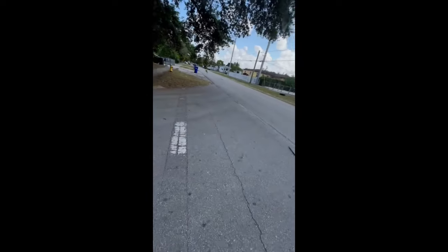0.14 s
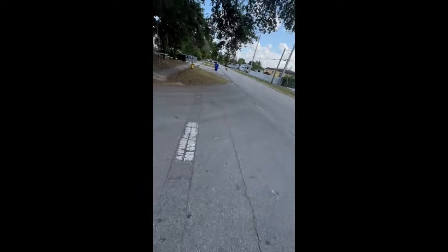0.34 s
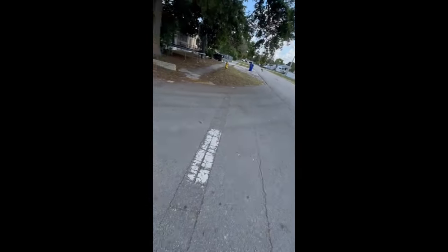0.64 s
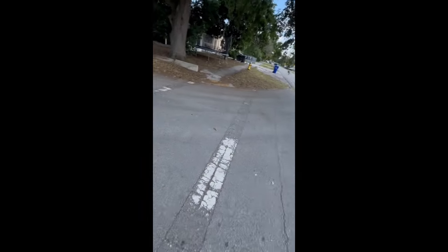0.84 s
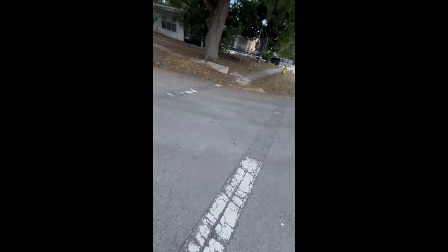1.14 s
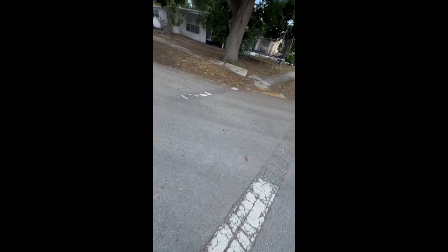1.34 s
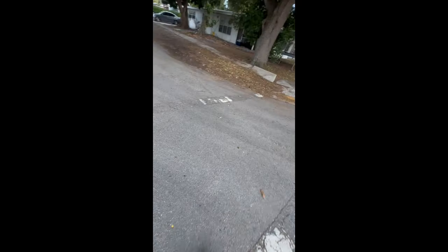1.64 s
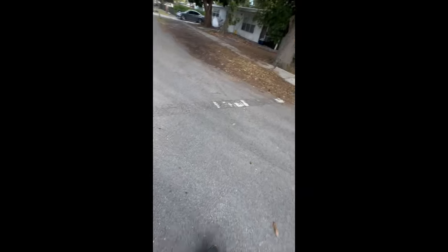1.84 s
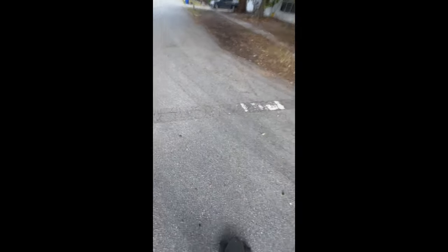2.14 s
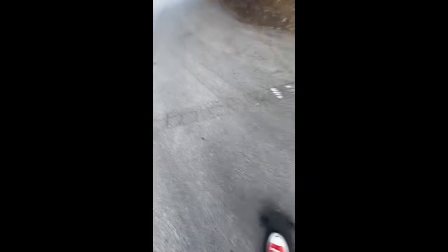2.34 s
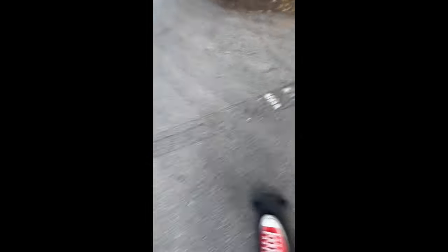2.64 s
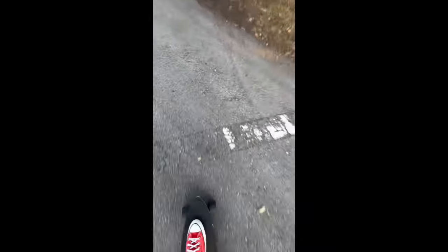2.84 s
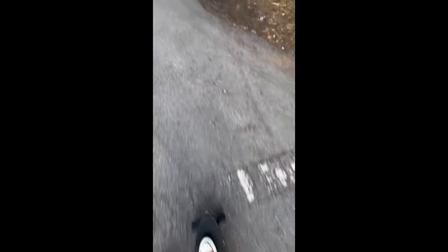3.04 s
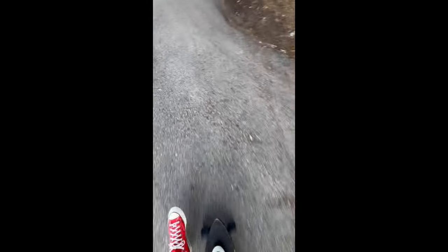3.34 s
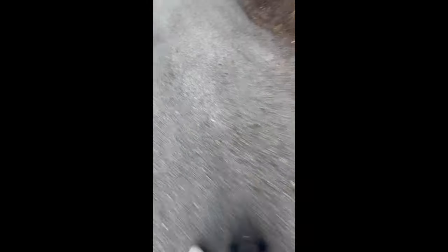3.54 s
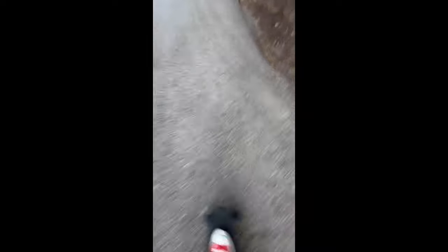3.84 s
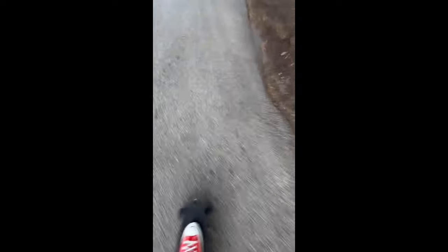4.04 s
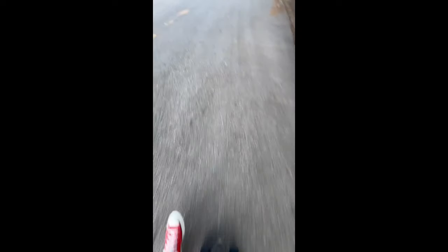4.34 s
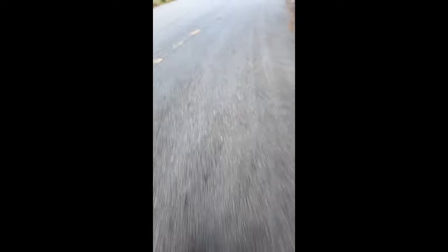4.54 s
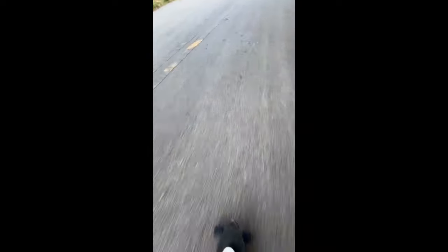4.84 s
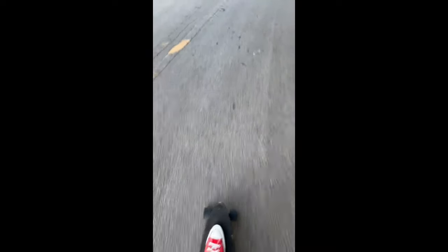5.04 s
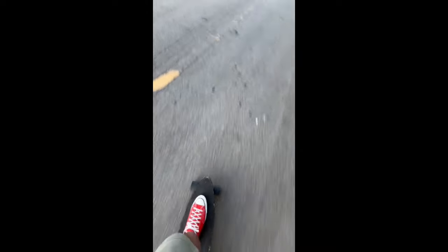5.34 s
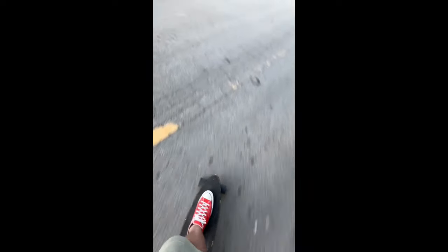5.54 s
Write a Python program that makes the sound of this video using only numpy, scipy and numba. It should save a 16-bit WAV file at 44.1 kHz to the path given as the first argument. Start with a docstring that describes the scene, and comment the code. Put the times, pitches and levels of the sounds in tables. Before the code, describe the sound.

On an open street, a passing car's smooth tyre roar pulls ahead and fades over the first few seconds. Grit ticks and wind puffs hit the handheld phone. Then a longboard deck rumbles over rough asphalt, wheels hissing, while a shoe scrapes and crunches in bursts, strongest near the end, with low wind buffeting in close stereo.

```python
"""A longboard is pushed over rough asphalt by a rider with a phone in hand: road grain shakes the deck into
its bending modes, the wheels hiss, and the shoe sole crunches grit in sticking, slipping bursts.
A car rolls away as coloured noise that changes its timing between the two microphone ports, then fades.
Loose stones tick and crack as short rings, wind and puffs press on the ports as slow noise,
and a cricket, a narrow band of noise, sings faintly over the smooth wash of the street."""
import sys
import numpy as np
from scipy import signal
from scipy.fft import rfft, irfft, next_fast_len
from scipy.io import wavfile
from scipy.ndimage import uniform_filter1d
from numba import njit

SR = 44100
rng = np.random.default_rng(int(sys.argv[2]) if len(sys.argv) > 2 else 0)


def dump_mix(stems):
    """Bounce the given channels to the path in sys.argv[1] as a 16-bit WAV at rate SR."""
    frames = np.atleast_2d(stems).T  # one column per channel
    limited = np.clip(frames, -1, 1)  # hard clip at full scale
    pcm = np.round(limited * 32767).astype(np.int16)
    wavfile.write(sys.argv[1], SR, pcm)


def invert_db(x):
    """Field ratio 10**(x/20) for x, a level in decibels (scalar or array-like)."""
    u = np.asarray(x, float) / 20
    return 10 ** u


N = 251414
SIZE = next_fast_len(N, real=True)
FREQS, TIMES = np.fft.rfftfreq(SIZE, 1 / SR), np.arange(N) / SR

# Tyre roar of the departing car. Each row: time in seconds, level in dB.
CAR_LEVEL = [(0.0, -29), (0.12, -27.5), (0.3, -26), (0.55, -26.5), (0.72, -25.5), (0.92, -27), (1.58, -33),
             (2.0, -35.5), (2.3, -41.5)]
# Tone of the tyre roar. Each row: frequency in Hz, relative gain in dB.
CAR_COLOUR = [(120, -17), (300, 1), (600, -7.5), (900, -0.5), (1300, -3), (1900, -13), (2500, -32),
              (5000, -34.5), (9000, -51)]
# Fuller tone while the car is close. Each row: frequency in Hz, gain in dB.
ALONGSIDE_BODY = [(150, 1.5), (350, 1), (600, 9.5), (900, 2.5), (1800, -2.5), (2700, 2), (4500, 3.5)]
# Lead of the left port over the right, car alongside. Each row: frequency in Hz, phase in radians.
ALONGSIDE_PHASE = [(0, -1), (350, -1.4), (850, -1.6), (1400, -1), (1700, -.2), (2070, 1), (2400, 3),
                   (2750, 3.6), (3300, 3.1), (4000, 2.5), (5550, 4), (8200, 8.5)]
# The same lead once the car has pulled ahead. Each row: frequency in Hz, phase in radians.
AHEAD_PHASE = [(0, 0), (350, -.3), (700, -.7), (1050, -1.1), (1400, .1), (2070, .1), (2400, 1.4),
               (2750, -.2), (4000, 1.5), (8200, 8.5)]

# Wheel hiss. Each row: time in seconds, level in dB.
HISS_LEVEL = [(0.0, -42), (0.5, -38.5), (1.0, -39.5), (1.5, -60), (2.2, -54.5), (3.0, -41), (3.55, -40.5),
              (4.0, -35.5), (4.6, -33), (5.3, -31.5), (5.5, -38.5), (5.7, -43)]
# Tone of the wheel hiss. Each row: frequency in Hz, relative gain in dB.
HISS_COLOUR = [(300, 13.5), (800, 21), (1500, -2.5), (2500, -6.5), (5000, -3), (8500, -5.5), (13000, -6),
               (16000, -22)]
# Tone of leaves and far traffic. Each row: frequency in Hz, relative gain in dB.
STREET_COLOUR = [(1200, 6), (2000, -3.5), (4000, -6), (7500, -6), (10000, -6), (15000, -13)]

# Puffs across the phone. Each row: start in seconds, hold in seconds, level in dB.
CROSS_PUFFS = [(0.03, 0.06, -29.5), (0.406, 0.026, -28), (0.466, 0.053, -28), (0.666, 0.051, -17.5),
               (0.728, 0.052, -25.5), (1.258, 0.092, -37), (2.29, 0.05, -36)]
# Tone of the puffs. Each row: frequency in Hz, relative gain in dB.
PUFF_COLOUR = [(40, -8), (100, 0), (220, 0), (400, -13), (800, -9), (1500, -28), (3000, -63)]
# Grit ticking off the wheels. Each row: time in seconds, drive of the bright crack in dB,
# drive of the duller body over the crack in dB.
TICKS = [(0.0466, -27, -8.5), (0.092, -22, -13), (0.138, -24, -24), (0.192, -27.5, -18),
         (0.3568, -22.5, -14), (0.364, -34, -10), (0.399, -29.5, -4), (0.541, -32, -3), (0.615, -25, -11),
         (0.6698, -29, -24), (1.0135, -32.5, 8.5), (1.837, -40, -2), (1.889, -40, -19), (2.69, -30.5, -8),
         (5.1068, -25.5, -23)]

# Deck shake. Each row: time in seconds, shake level in dB, extra gain of the upper modes in dB.
ROLL = [(0.0, -66, -12), (0.16, -35.5, -4), (0.58, -29.5, 3), (0.68, -30, -13), (0.78, -29, -8.5),
        (1.45, -34, -2), (2.2, -39, 1), (2.44, -31, -3), (2.55, -39.5, -1.5), (2.79, -29, -5),
        (3.05, -38.5, 2.5), (3.3, -32, -3.5), (3.55, -36, -8), (3.72, -26, -7), (3.83, -20.5, -2.5),
        (4.2, -25.5, -1), (4.5, -25.5, -8.5), (4.84, -20, -3.5), (4.97, -26.5, 3.5), (5.07, -19, -5),
        (5.3, -20, 3), (5.37, -24.5, 10), (5.58, -25.5, 6.5), (5.7, -30.5, 7)]
# Bending modes of the deck, two lower then the upper. Each row: pitch in Hz, nominal width in Hz,
# relative level in dB.
DECK_MODES = [(239.2, 91, 0.5), (385.5, 78, -6), (478.2, 78, -2), (547, 95, -4)]
# Urethane roar of the wheels. Each row: time in seconds, level in dB.
ROAR_LEVEL = [(1.6, -84), (2.2, -43), (3.1, -51.5), (3.6, -37.5), (4.3, -48), (5.0, -49), (5.4, -40),
              (5.7, -43)]

# Breeze on the ports. Each row: time in seconds, level in dB.
BREEZE_LEVEL = [(0.0, -70), (0.35, -37), (0.55, -37.5), (0.9, -43.5), (1.3, -39), (1.6, -35.5),
                (2.2, -34.5), (2.9, -31.5), (3.55, -36.5), (4.2, -24.5), (4.6, -32), (5.1, -21.5),
                (5.7, -30)]
# Tone of the breeze. Each row: frequency in Hz, relative gain in dB.
BREEZE_COLOUR = [(20, -36), (45, 3.5), (70, -6.5), (110, -0.5), (160, -0.5), (250, -17.5), (350, -14.5),
                 (500, -9), (1200, -47.5)]
# Gusts over the breeze. Each row: start in seconds, hold in seconds, level in dB.
GUSTS = [(0.612, 0.14, -37), (2.42, 0.072, -31), (2.609, 0.2, -22.5), (3.606, 0.029, -23),
         (3.74, 0.27, -20), (4.09, 0.18, -34.5), (4.816, 0.063, -18), (4.958, 0.079, -21),
         (5.194, 0.31, -19), (5.59, 0.035, -19.5), (5.646, 0.054, -23.5)]
# Deeper tone of the gusts. Each row: frequency in Hz, relative gain in dB.
GUST_COLOUR = [(20, -18), (45, 0), (70, 0), (110, -3.5), (220, -11.5), (340, -16), (500, -19.5),
               (1200, -53.5)]
# Sharp thumps of wind. Each row: time in seconds, relative size in dB, pitch in Hz.
BUFFETS = [(0.635, -30, 49.6), (0.672, -45, 55), (0.732, -24, 51.3), (2.592, -13, 71.6), (2.648, -20, 78.5),
           (2.688, -14.5, 68), (2.718, -15, 75), (2.768, -20, 77), (5.199, -19, 65), (5.251, -20, 80),
           (5.656, -14.5, 62)]

# Cricket song. Each row: time in seconds, level in dB before it wavers.
CRICKET_LEVEL = [(1.0, -90), (1.25, -68), (1.4, -68), (1.7, -74), (1.8, -78), (1.84, -67), (1.92, -72),
                 (2.3, -93)]

# Ranges where crushed grit rings. Each row: pitch in Hz, scatter of pitch as a share,
# ring time in milliseconds, relative size in dB, fineness from 0 to 1.
GRIT_RANGES = [(1400, 0.079, 0.24, 0, 0.1), (2250, 0.05, 0.98, 1, 0.3), (2660, 0.039, 0.39, 6.5, 0),
               (3540, 0.07, 0.49, 7, 0.16), (4700, 0.1, 0.31, 9.5, 0.07), (6380, 0.077, 0.28, 12, 0.24),
               (8190, 0.059, 0.24, 7, 1), (9700, 0.023, 0.21, 8.5, 0.36), (11880, 0.011, 0.54, -0.5, 1),
               (13900, 0.066, 0.34, -10, 1)]
# Sole dragging over grit. Each row: start in seconds, hold in seconds, crunch level in dB,
# fine grit over coarse in dB.
DRAGS = [(2.933, 0.058, -46.5, 5.5), (3.242, 0.029, -48, 1), (3.299, 0.021, -35, 4),
         (3.345, 0.095, -39.5, 8), (3.467, 0.031, -38, 2.5), (3.54, 0.16, -53.5, 9.5),
         (3.742, 0.012, -43, 0), (3.786, 0.081, -40, 3.5), (3.877, 0.21, -48.5, 6), (4.325, 0.26, -52, 1),
         (4.56, 0.0072, -33.5, -1), (4.6, 0.036, -42, 2), (4.666, .175, -29, -18), (4.835, 0.046, -34, 8),
         (4.9, 0.081, -38.5, 11.5), (5.152, 0.04, -37, 10.5), (5.196, 0.11, -36, 11.5),
         (5.675, .03, -44.5, -18)]
# Single stones cracking. Each row: time in seconds, relative size in dB, loudest pitch in Hz.
STONES = [(2.3444, -23.5, 2600), (2.9417, -35, 2360), (2.96, -29, 2450), (2.9905, -28, 6340),
          (3.257, -26, 2430), (3.291, -30, 8050), (3.2997, -19, 2600), (3.31, -17.5, 2510),
          (3.3195, -28, 8500), (3.338, -33, 2500), (3.3497, -24, 2660), (3.386, -16, 6900),
          (3.409, -19.5, 2720), (3.4216, -25, 2600), (3.434, -24, 2980), (3.4723, -20, 2660),
          (3.5007, -21.5, 2410), (3.514, -25.5, 2600), (3.5401, -27, 2100), (3.5577, -26, 2780),
          (3.575, -22.5, 3150), (3.634, -27, 2080), (3.686, -28, 2080), (3.739, -22, 2230),
          (3.7538, -19, 2230), (3.7893, -25, 2530), (3.7965, -30, 7500), (3.8225, -20.5, 2250),
          (3.854, -21, 2300), (3.8605, -19, 2360), (3.924, -23, 2420), (3.9645, -15, 4070),
          (4.029, -25, 2340), (4.0823, -28, 3800), (4.3167, -46, 2530), (4.3412, -33, 2320),
          (4.369, -18.5, 2620), (4.4098, -28, 5200), (4.4303, -25, 3800), (4.4558, -16, 4150),
          (4.4804, -14.5, 4150), (4.564, -26, 2340), (4.6142, -22, 3830), (4.6335, -21, 2480),
          (4.649, -15, 4500), (4.6643, -13.5, 7900), (4.6687, -17, 2640), (4.6813, -6.5, 2460),
          (4.6945, -9, 2300), (4.709, -12, 2780), (4.7403, -11, 2220), (4.7576, -5, 2350),
          (4.7756, -9, 2260), (4.781, -16, 2320), (4.8186, -14, 2500), (4.8396, -16, 2730),
          (4.881, -15, 8600), (4.906, -32, 2360), (4.919, -22, 7450), (4.975, -23, 8000),
          (5.0958, -24.5, 2400), (5.155, -14, 8400), (5.1812, -20, 2700), (5.2002, -22, 8200),
          (5.22, -23, 8600), (5.243, -20, 8020), (5.268, -29, 8200), (5.278, -32, 8300),
          (5.2934, -30, 2470), (5.316, -19, 8280), (5.323, -26, 5000)]
# Shards of one stone in order, the second largest. Each entry: relative size in dB.
SHARD_SIZES = [-4, 0, -1, -4, -8]
# A foot shifting on the deck. Each row: start in seconds, hold in seconds, level in dB.
SHUFFLES = [(2.422, 0.056, -30), (2.508, 0.019, -29)]

# Lead of the left port for sounds from under the phone. Each row: frequency in Hz, phase in radians.
PORT_PHASE = [(0, 0), (300, .3), (520, 1.1), (700, 1.4), (1400, 1.6), (2100, 1.9), (4100, 2.5), (5100, 2.0),
              (5550, np.pi), (6900, 4.8), (8200, 2.1 * np.pi), (10200, 3 * np.pi), (11200, 3 * np.pi),
              (13000, 4 * np.pi), (14000, 4 * np.pi), (16300, 5 * np.pi)]
# Share that the ports do not hear alike. Each row: frequency in Hz, gain in dB.
SCATTER = [(100, -8), (1000, -9), (2300, -2), (4500, -3), (5550, -10), (7500, -4), (9300, -7), (10300, -20),
           (11100, -20), (12100, -9), (13100, -20), (13900, -20), (14800, -6)]
# Shading by the phone's body. Each row: frequency in Hz, left minus right in dB.
PORT_BALANCE = [(300, 0), (520, 1.5), (700, 4.5), (950, 7), (1500, 3), (2500, -7), (3300, -3), (4400, -4.5),
                (5500, 0), (7600, 3), (9600, 0)]
# Overall tone: bass and treble roll-off, with a dip near 11 kHz. Each row: frequency in Hz, gain in dB.
OVERALL_TONE = [(30, -12), (60, -0.5), (4900, -2.5), (5500, -2), (6200, -3), (9200, -3), (10000, -5),
                (11000, -13.5), (11900, -6.5), (15000, -2.5), (15600, -12), (15900, -53)]

GUST_ATTACK_S, GUST_RELEASE_S = 0.007, 0.042  # time per 20 dB of climb or fall
FOOT_ATTACK_S, FOOT_RELEASE_S = 0.025, 0.022  # the same for drags and shuffles


def unit(x):
    """Scales to rms 1."""
    return x / np.sqrt(np.mean(x ** 2))


def curves(table):
    """Draws every column of a time table, sample by sample."""
    s, *columns = np.transpose(table)
    return [np.interp(TIMES, s, column) for column in columns]


def along(table):
    """Reads a (Hz, value) table at every frequency of the spectrum, on a log scale."""
    hz, value = np.transpose(table)
    return np.interp(np.log(FREQS + 1), np.log(hz), value)


def filtered(x, response):
    """Multiplies the spectrum by a response."""
    return irfft(rfft(x, SIZE) * response, SIZE)[..., :N]


def colour(x, table):
    """Shapes the tone by (Hz, dB) points."""
    return filtered(x, invert_db(along(table)))


def ring(x, hz, width_hz):
    """One resonance, gain 1 at its centre."""
    return signal.lfilter(*signal.iirpeak(hz, hz / width_hz, SR), x)


def steep(x, hz, width_hz):
    """Two resonances in a row: dark flanks and a soft start."""
    return ring(ring(x, hz, 1.25 * width_hz), hz, 1.25 * width_hz)


def walk(rate):
    """Random levels held for 1 / rate seconds and slewed twice; spread near 1."""
    hold = int(SR / rate)
    steps = np.repeat(rng.standard_normal(N // hold + 1), hold)
    return 1.34 * uniform_filter1d(uniform_filter1d(steps, hold), hold)[:N]


def grains(per_s, spread_db):
    """Clicks at random moments; a few are much larger than the rest."""
    happens = rng.random(N) < per_s / SR
    luck = np.minimum(rng.exponential(size=N), 5)
    return happens * rng.standard_normal(N) * invert_db(spread_db * luck)


def blows(s, size):
    """One click at each given time."""
    out = np.zeros(N)
    out[(np.asarray(s) * SR).astype(int)] = size
    return out


@njit
def add_rings(out, start, turn, ring_samples, size):
    """Adds short sine rings whose envelope rises and dies as t exp(1 - t), peaking at size."""
    for g in range(len(start)):
        for i in range(min(int(7 * ring_samples[g]), len(out) - start[g])):
            t = i / ring_samples[g]
            out[start[g] + i] += size[g] * t * np.exp(1 - t) * np.sin(turn[g] * i)
    return out


def swells(start, hold, db, attack_s, release_s):
    """Level in dB of each row through time: a steady climb, a hold, a steady fall."""
    start, hold, db = (np.asarray(column)[:, None] for column in (start, hold, db))
    before = (start - TIMES) / attack_s
    after = (TIMES - start - hold) / release_s
    return db - 20 * np.maximum(0, np.maximum(before, after))


def drag():
    """Crunch level and fineness of whichever drag is loudest at each moment."""
    start, hold, db, fine_db = np.transpose(DRAGS)
    rows = swells(start, hold, db, FOOT_ATTACK_S, FOOT_RELEASE_S)
    lifted_db = -58  # floor between drags
    return np.maximum(rows.max(axis=0), lifted_db), fine_db[rows.argmax(axis=0)]


def ports(direct, diffuse, diffuse_db, phase=PORT_PHASE):
    """Each port gets scattered sound in opposite sign, and hears the source out of step with the other."""
    turn = np.exp(0.5j * np.interp(FREQS, *np.transpose(phase)))
    own = invert_db(diffuse_db) * colour(diffuse, SCATTER)
    return filtered(np.array([direct + own, direct - own]), np.array([turn, 1 / turn]))


def tyre_noise():
    """Smooth tyre roar that wavers slowly, with the hiss of the tread above it."""
    roar = unit(colour(rng.standard_normal(N), CAR_COLOUR)) * invert_db(0.85 * walk(8.51))
    tread = unit(steep(rng.standard_normal(N), 2240, 1380))
    return roar + invert_db(-16) * tread


def car():
    """Tyre noise crossfades from alongside to ahead by port timing and tone, then fades away."""
    roar_db, = curves(CAR_LEVEL)
    roar = np.array([tyre_noise() for _ in range(2)])
    last_s = CAR_LEVEL[-1][0]
    fade = np.interp(TIMES, [last_s, last_s + 1.53], [1, 0])
    pulls_ahead_s, pull_takes_s = 0.73, 0.3  # midpoint and length of the crossfade
    ahead = np.clip(0.5 + (TIMES - pulls_ahead_s) / pull_takes_s, 0, 1)
    close = ports(*colour(roar, ALONGSIDE_BODY), diffuse_db=-5.5, phase=ALONGSIDE_PHASE)
    gone_ahead = ports(*roar, diffuse_db=-1.5, phase=AHEAD_PHASE)
    return fade * invert_db(roar_db) * ((1 - ahead) * close + ahead * gone_ahead)


def wheels():
    """Fine grain under the urethane: dense clicks make a flickering hiss, stronger while a sole drags."""
    hiss = [unit(colour(grains(6000, 2.9) * invert_db(2.65 * walk(29.71)), HISS_COLOUR)) for _ in range(2)]
    drag_hiss_db = drag()[0] + 3.5
    gain = np.hypot(invert_db(curves(HISS_LEVEL)[0]), invert_db(drag_hiss_db))
    return gain * ports(*hiss, diffuse_db=0.5)


def street():
    """Leaves and far traffic: steady coloured noise, a smooth, faint wash from all around."""
    wash = unit(colour(rng.standard_normal((2, N)), STREET_COLOUR))
    return invert_db(-54) * ports(*wash, diffuse_db=5.5)


def puffs():
    """Noise pressing one port and pulling the other, and a cover gain that drops under strong puffs."""
    db = swells(*np.transpose(CROSS_PUFFS), GUST_ATTACK_S, GUST_RELEASE_S).max(axis=0)
    covers_db, depth = -25, 0.83  # above this level, dB lost per dB
    cover = invert_db(-depth * np.maximum(0, db - covers_db))
    pressure = unit(colour(rng.standard_normal(N), PUFF_COLOUR)) * invert_db(db)
    return pressure * np.array([[1], [-1]]), cover


def grit():
    """Tiny stones tick: quickly dying noise through a bright crack and a duller body, each with its own grain."""
    s, crack_db, body_db = np.transpose(TICKS)
    crack_decay = signal.lfilter([1], [1, -0.978], blows(s, invert_db(crack_db)))
    body_decay = signal.lfilter([1], [1, -0.98], blows(s, invert_db(crack_db + body_db)))
    crack = ring(crack_decay * rng.standard_normal((2, N)), 11000, 9000)
    body = steep(body_decay * rng.standard_normal((2, N)), 4800, 2200)
    return ports(*(1.7 * crack + 5 * body), diffuse_db=0)


def deck():
    """Stones in the asphalt jolt the wheels: the deck rings in its bending modes and the urethane roars."""
    shake_db, upper_db = curves(ROLL)
    drag_db = drag()[0]
    roar_gain = np.hypot(invert_db(curves(ROAR_LEVEL)[0]), invert_db(drag_db + 0.5))
    parts = []
    for _ in range(2):
        road = unit(grains(1500, 1.6)) * invert_db(1.44 * walk(25.12))
        low, twist, *upper = (invert_db(db) * unit(steep(road, hz, width)) for hz, width, db in DECK_MODES)
        modes = low + twist + invert_db(upper_db) * sum(upper)
        roar = unit(steep(road, 730, 695)) + invert_db(-18.5) * unit(steep(road, 1600, 1030))
        # the unloaded truck buzzes while a foot is off the deck
        buzz = invert_db(drag_db - 6.5) * unit(steep(road, 1052, 220))
        parts.append(invert_db(shake_db) * modes + roar_gain * roar + buzz)
    return ports(*parts, diffuse_db=-15.5)


def wind():
    """Eddies press on each port mostly on its own, deeper in the gusts; a few break as a thump on both."""
    gust_db = swells(*np.transpose(GUSTS), GUST_ATTACK_S, GUST_RELEASE_S).max(axis=0)
    out = 0
    for table, db in (BREEZE_COLOUR, curves(BREEZE_LEVEL)[0]), (GUST_COLOUR, gust_db):
        shared = rng.standard_normal(N)
        eddies = [colour(0.64 * shared + rng.standard_normal(N), table) * invert_db(1.6 * walk(13))
                  for _ in range(2)]
        out = out + unit(np.array(eddies)) * invert_db(db)
    s, db, hz = np.transpose(BUFFETS)
    thumps = add_rings(np.zeros(N), (s * SR).astype(int), 2 * np.pi * hz / SR, 0.45 * SR / hz, invert_db(db + 0.5))
    return out + thumps


def cricket():
    """A thin wavering line: noise through one very narrow resonance."""
    line = unit(ring(rng.standard_normal(N), 9190, 13))
    return line * invert_db(curves(CRICKET_LEVEL)[0] + 4.1 * walk(8.1))


def crush(s, db, luck_db):
    """Each grain at time s sounds every grit range with its own pitch and luck; db is grains x ranges."""
    hz, scatter, ring_ms, range_db, _ = np.transpose(GRIT_RANGES)
    chance = rng.standard_normal((len(s), 2, len(GRIT_RANGES)))
    pitch = np.minimum(hz * np.exp(scatter * chance[:, 0]), 0.45 * SR)
    size = invert_db(db + range_db + luck_db * chance[:, 1])
    start = np.repeat((s * SR).astype(int), len(GRIT_RANGES))
    ring_samples = np.tile(ring_ms, len(s)) * SR / 1000
    return add_rings(np.zeros(N), start, 2 * np.pi * pitch.ravel() / SR, ring_samples, size.ravel())


def crunch(coarse_db, fine_db):
    """The sole sticks and lets go: each slip pours out a burst of grit, with loose grains in between."""
    slips_per_s, uneven, slip_scatter_db = 140, 0.4, 2
    pours_s, loose_share = 0.0015, 0.5  # decay of one burst; share of grains between slips
    slip = rng.standard_normal((int(slips_per_s * N / SR), 2))
    slip_s = (np.arange(len(slip)) + uneven * slip[:, 0]) / slips_per_s
    chance = rng.random((12000, 4))  # one row a grain
    which = (chance[:, 0] * len(slip)).astype(int)
    loose = chance[:, 2] < loose_share
    poured_s = slip_s[which] - pours_s * np.log(1 - chance[:, 3])
    s = np.clip(np.where(loose, chance[:, 0] * N / SR, poured_s), 0, (N - 1) / SR)
    at = (s * SR).astype(int)
    slip_db = ~loose * slip_scatter_db * slip[which, 1]
    luck_db = -2.6 * np.log(chance[:, 1] + 0.03)  # a few grains are much larger
    grain_db = coarse_db[at] + slip_db + luck_db - 19.0
    fineness = np.array(GRIT_RANGES)[:, 4]
    return crush(s, grain_db[:, None] + fineness * fine_db[at, None], luck_db=4.0)


def stones():
    """Lone stones snap, then break into shards, loudest near their own pitch; bright ones break faster."""
    s, stone_db, pitch = np.transpose(STONES)
    start, turn = (s * SR).astype(int), 2 * np.pi * pitch / SR
    bright = np.log2(pitch / 2600).clip(0, 1)  # octaves above a dull stone, one at most
    range_hz, fineness = np.array(GRIT_RANGES)[:, 0], np.array(GRIT_RANGES)[:, 4]
    near_db = -8 * np.abs(np.log2(range_hz / pitch[:, None])) - 3.5 * fineness
    shard_gap_s = 0.0013
    out = np.zeros(N)
    for shard, shard_db in enumerate(SHARD_SIZES):
        late = (shard - 0.5) * shard_gap_s / 2 ** bright * (0.5 + rng.random(len(s)))
        size_db = stone_db + shard_db - 2.5
        out = out + crush(s + late, size_db[:, None] + near_db - 16.0, luck_db=3)
        shard_start = ((s + late) * SR).astype(int)
        shard_turn = turn * np.exp(0.12 * rng.standard_normal(len(s)))
        add_rings(out, shard_start, shard_turn, 0.9 * SR / pitch, invert_db(size_db - 8))
    # the first break is a hard, wide snap, harder by 12 dB per octave of brightness
    return add_rings(out, start, turn, SR / pitch, invert_db(stone_db - 12 + 12 * bright))


def rasp(coarse_db, fine_db):
    """The rubber sole hums while it drags, lower when pressed hard and weaker over fine grit."""
    pressed = np.clip((coarse_db + 37.5) / 5, 0, 1)  # the hum sinks over 5 dB of crunch from -37.5 dB
    rub = grains(5000, 4.3)
    light, hard = (unit(steep(rub, hz, 420)) for hz in (2500, 2230))
    hum_db = coarse_db - 3 - 0.43 * np.maximum(fine_db, 0) + 1.6 * walk(90)
    return invert_db(hum_db) * ((1 - 0.5 * pressed) * light + pressed * hard)


def thrown_back(x, count=6):
    """Random echo patterns a few milliseconds long crossfade steadily, so no single one colours the sound."""
    patterns_per_s = 30
    out = 0
    for k in range(count):
        share = np.maximum(0, 1 - np.abs((TIMES * patterns_per_s - k) % count - count / 2))
        bounces = unit(rng.standard_normal(800) * np.exp(-np.arange(800) / 70)) / 28
        out = out + signal.oaconvolve(x * np.sqrt(share), bounces)[:N]
    return out


def sole():
    """The shoe on the road: crunching grit, cracking stones and rubber hum, with their near echoes."""
    coarse_db, fine_db = drag()
    out = crunch(coarse_db, fine_db) + stones() + rasp(coarse_db, fine_db)
    return ports(out, thrown_back(out), diffuse_db=1)


def shuffle():
    """The shifting foot rattles the loaded deck: random clicks through one resonance."""
    db = swells(*np.transpose(SHUFFLES), FOOT_ATTACK_S, FOOT_RELEASE_S).max(axis=0)
    return invert_db(db) * unit(steep(grains(1500, 1.6), 373, 130))


def scene():
    """The phone's body shades board and street differently for each port; a puff masks only the lows."""
    shade = invert_db(along(PORT_BALANCE) / 2)
    board = filtered(street() + deck() + wheels() + sole() + grit(), np.array([shade, 1 / shade]))
    airborne = board + car()
    puff, cover = puffs()
    lows = colour(airborne, [(20, -10), (600, 4.5), (1200, -34), (16000, -60)])
    return airborne - (1 - cover) * lows + shuffle() + puff + wind() + cricket()


def low_pass(x):
    """Removes everything above the highest recorded frequency."""
    return signal.sosfilt(signal.butter(12, 15790, fs=SR, output="sos"), x)


def record(dry):
    """An overall tone curve with a dip near 11 kHz shapes the whole mix."""
    mix = colour(dry, OVERALL_TONE)
    return low_pass(mix)


dry = scene()
out = record(dry)
dump_mix(out)
```